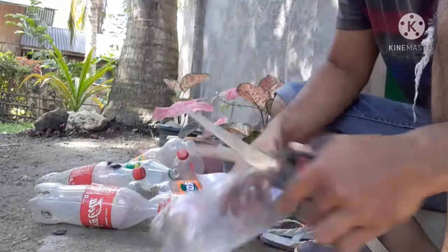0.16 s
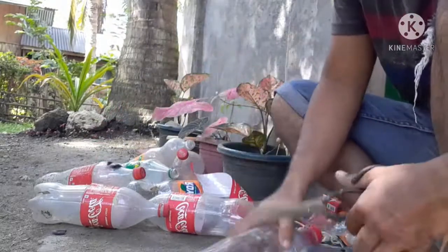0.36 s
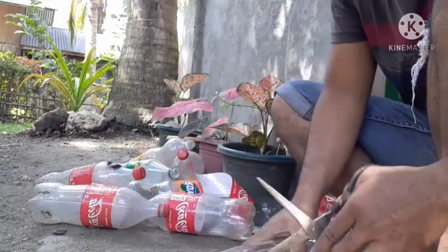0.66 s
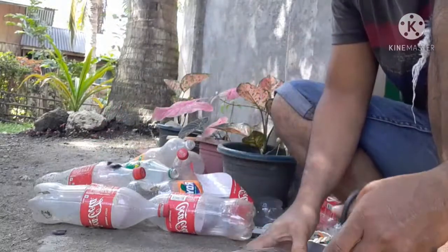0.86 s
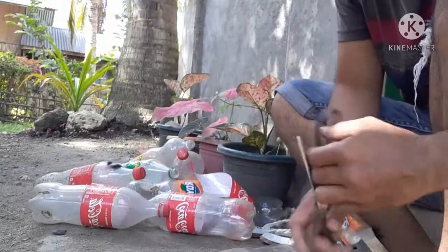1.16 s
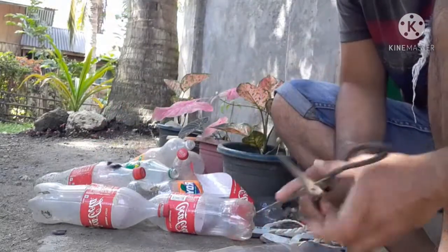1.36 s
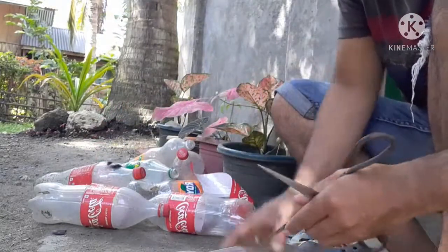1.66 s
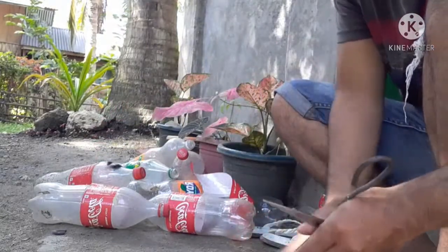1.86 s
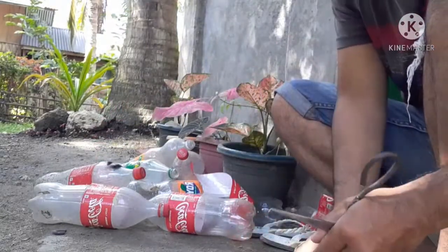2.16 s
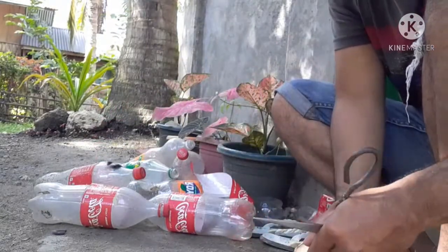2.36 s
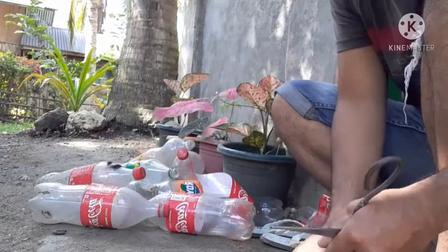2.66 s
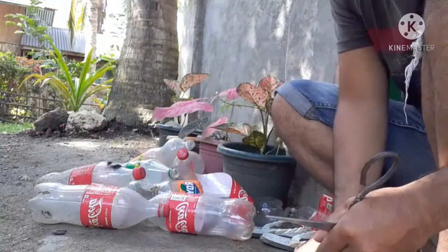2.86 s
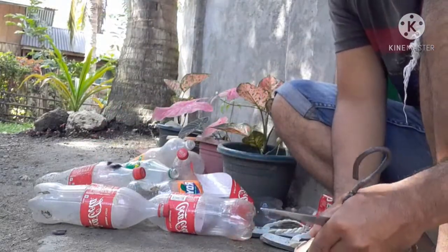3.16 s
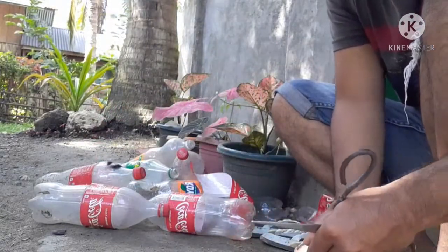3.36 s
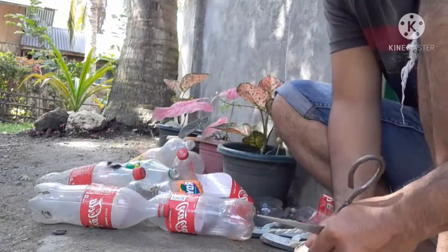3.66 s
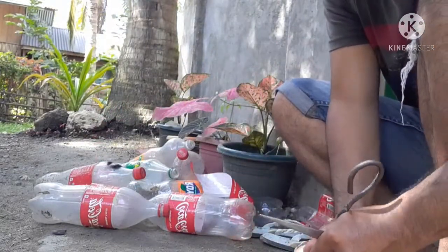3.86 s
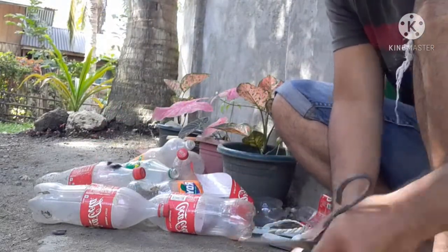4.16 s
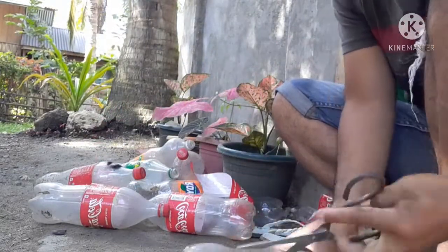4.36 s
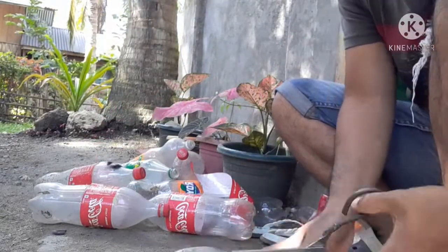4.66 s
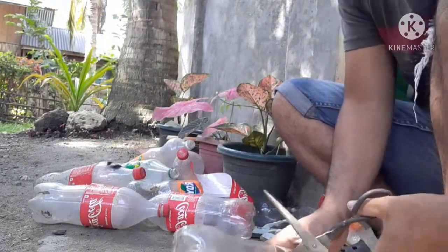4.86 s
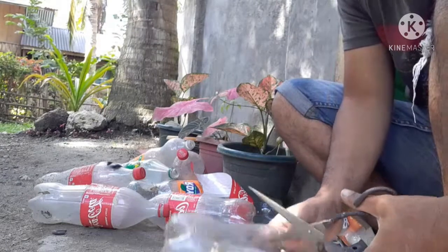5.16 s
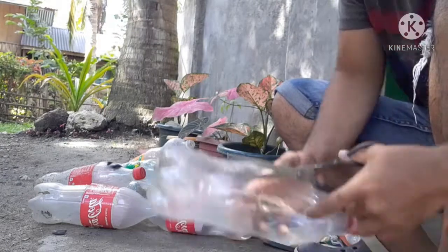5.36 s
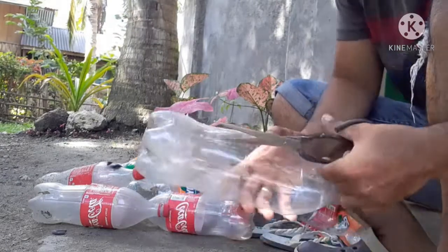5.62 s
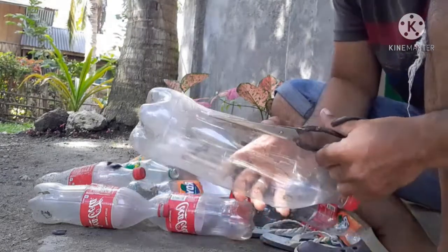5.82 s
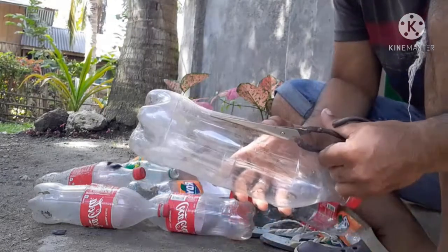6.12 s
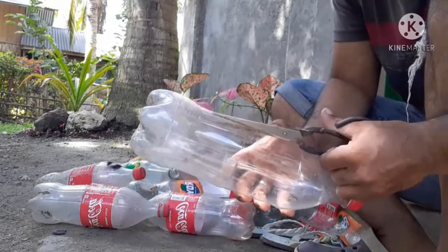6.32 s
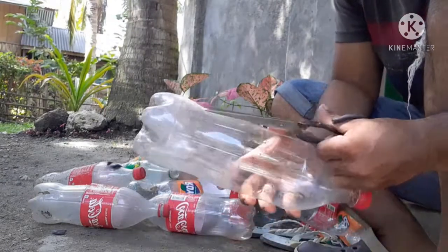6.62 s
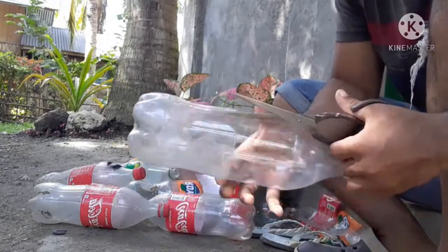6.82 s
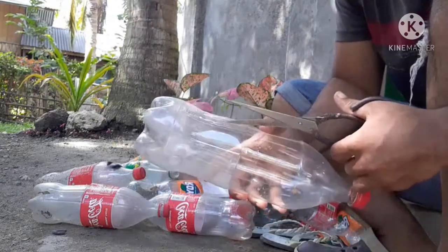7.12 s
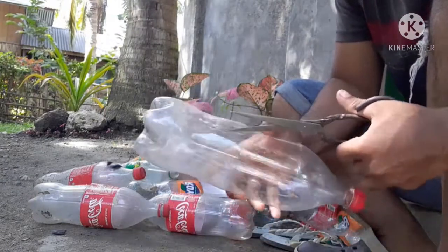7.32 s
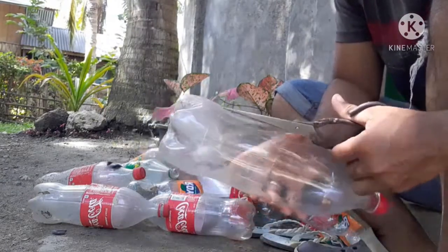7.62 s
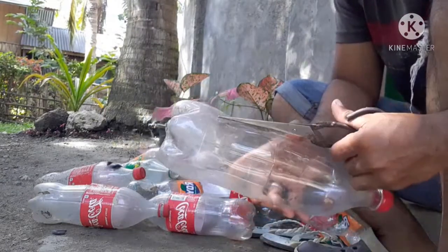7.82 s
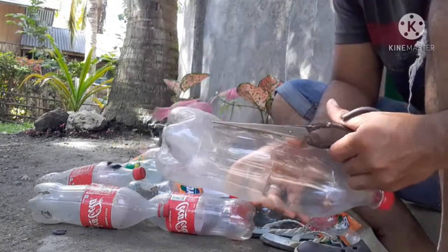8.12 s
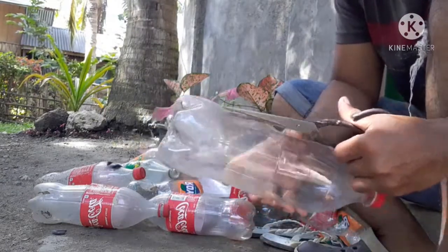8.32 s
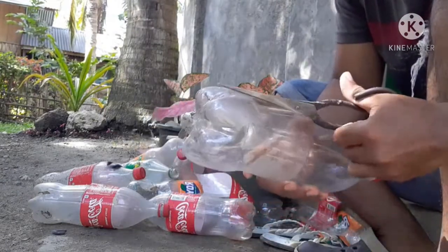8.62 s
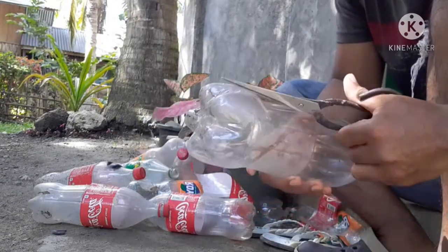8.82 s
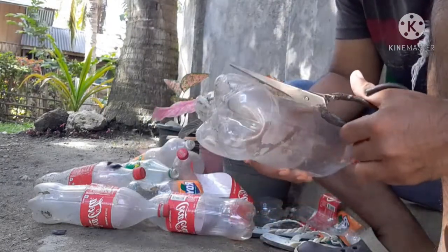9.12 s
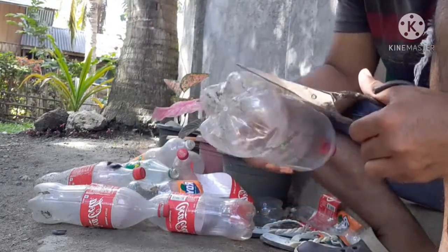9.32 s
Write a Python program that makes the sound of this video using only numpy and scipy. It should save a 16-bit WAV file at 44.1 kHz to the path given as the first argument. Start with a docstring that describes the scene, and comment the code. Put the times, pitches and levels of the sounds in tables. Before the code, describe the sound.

Scissors cut a thin plastic bottle with scattered snaps and crinkles outdoors, and an animal gives one squeal midway.

```python
"""Scissors cutting a plastic bottle

Scissors pierce and cut a thin plastic bottle close to a phone in a walled yard. The shell buckles
in sharp snaps that set it ringing, and crinkles in the hand between them. An animal nearby, perhaps
a young rooster, gives one long squeal, hoarse at first, then clear and sinking, over a faint rumble."""
import sys
import numpy as np
from scipy import signal
from scipy.fft import rfft, irfft
from scipy.io import wavfile
from scipy.ndimage import uniform_filter1d

SR = 44100
rng = np.random.default_rng(int(sys.argv[2]) if len(sys.argv) > 2 else 0)


def master(y):
    """Save y as 16-bit WAV."""
    cut = np.clip(np.atleast_2d(y).T, -1, 1)
    pcm = np.round(cut * 32767)  # scale
    wavfile.write(sys.argv[1], SR, pcm.astype(np.int16))


N = 418068
TOP_HZ = 15900


def undb(db):
    """Decibels to gain."""
    return 10 ** (np.asarray(db) / 20)


def unit(x):
    """Scale to unit rms."""
    return x / np.sqrt(np.mean(x ** 2) + 1e-20)


def freqs(size):
    """Bin frequencies, floored at 1 Hz."""
    return np.maximum(np.fft.rfftfreq(size, 1 / SR), 1)


def contour(points, hz):
    """Interpolate (freq_hz, level_db) points over log frequency."""
    freq_hz, level_db = np.transpose(points)
    return np.interp(np.log(hz), np.log(freq_hz), level_db)


def band(x, lo_hz, hi_hz, order=2):
    """Causal band-pass."""
    sos = signal.butter(order, [lo_hz, min(hi_hz, SR / 2 - 1)], "band", fs=SR, output="sos")
    return signal.sosfilt(sos, x)


def resonate(x, modes):
    """Sum of resonances, one per (freq_hz, width_hz, gain_db) row."""
    return sum(undb(db) * band(x, hz - width / 2, hz + width / 2, order=1) for hz, width, db in modes)


def walk(rate_hz):
    """Smooth random wander, unit rms."""
    hold = max(int(SR / rate_hz), 1)
    steps = np.repeat(rng.standard_normal(N // hold + 1), hold)
    return unit(uniform_filter1d(uniform_filter1d(steps, hold), hold)[:N])


def add(track, start_s, x):
    """Mix x into the track at start_s."""
    i = max(int(start_s * SR), 0)
    track[..., i:i + x.shape[-1]] += x[..., :max(N - i, 0)]


# narrow-toned wall pops and thin high blade ticks: start_s, level_db, pitch_hz
POPS_AND_TICKS = [(2.1479, -48, 9150), (2.875, -47.9, 8600), (2.8925, -38, 8300), (3.47, -35, 1550),
                  (3.5462, -46.5, 8790), (4.1489, -30, 950), (4.8536, -30, 3256), (4.9951, -30, 1680),
                  (5.249, -27.5, 1670), (6.5205, -24.5, 5330), (6.7503, -48, 5530), (7.057, -57.5, 2100),
                  (7.6352, -47.5, 3920), (7.7599, -36.5, 3450), (7.8616, -35, 4650), (8.7365, -50, 3500),
                  (8.766, -44.5, 1710), (8.9039, -43.5, 2080), (9.0376, -44, 1750), (9.1296, -36, 2670),
                  (9.1757, -40.5, 2130)]
# broad cracks and dull knocks of the bottle: start_s, level_db, pitch_hz
CRACKS_AND_KNOCKS = [(0.3232, -48.5, 1210), (0.855, -58.5, 500), (1.428, -66, 3020), (1.6903, -42.5, 5900),
                     (1.862, -49.5, 5730), (2.006, -44.5, 8700), (2.228, -57.5, 640), (2.3989, -41.5, 8600),
                     (2.514, -43, 4500), (3.1193, -49, 5800), (3.2857, -29.5, 1300), (3.302, -23.5, 2100),
                     (3.3198, -27, 4710), (3.8829, -31, 9000), (3.93, -33.5, 4150), (3.9347, -23.5, 1340),
                     (3.9643, -20.5, 734), (4.0397, -20, 815), (4.1916, -20, 945), (4.1949, -23, 3448),
                     (4.2185, -23.5, 4070), (4.6106, -29.5, 1720), (4.7398, -26, 3400), (4.7435, -25, 2000),
                     (4.9483, -36, 1646), (5.1832, -37, 2047), (6.048, -54, 860), (6.5035, -45, 1100),
                     (7.3849, -37.5, 1720), (7.4799, -44, 2320), (7.872, -35.5, 3120), (7.9648, -38, 2550),
                     (8.2012, -34, 1560), (8.216, -38, 1850), (8.2322, -35.5, 3630), (8.3174, -25, 3580),
                     (8.3227, -26.5, 3370), (8.3471, -21.5, 2000), (8.841, -42.5, 2960), (9.455, -45, 3800)]


def snaps():
    """The wall pops and the blades tick; the bottle cracks and knocks as it is cut, handled or set down."""
    narrow = impacts(POPS_AND_TICKS, below_db_per_oct=8.5, above_db_per_oct=27)
    broad = impacts(CRACKS_AND_KNOCKS, below_db_per_oct=5.5, above_db_per_oct=7)
    return narrow + broad


# body, crack and sizzle of a snap: low_hz, centre_hz, high_hz
IMPACT_BANDS = [(150, 800, 1400), (1400, 2600, 5000), (5000, 8500, 16000)]


def impacts(events, below_db_per_oct, above_db_per_oct, creep_db=-29, stereo_spread=.6):
    """A faint lead-in, then a burst of milliseconds; bending waves circle the bottle and die away."""
    lead_s, snap_s = .012, .006
    decay_s, ring_t60_s, ring_db = (.0023, .0019, .0014), (.12, .15, .15), (-15.5, -16, -15.5)
    out, t = np.zeros((2, N)), np.arange(SR // 4) / SR - lead_s
    after_s = np.maximum(t, 0)
    for start_s, level_db, pitch_hz in events:
        burst, wash = rng.standard_normal((2, 1, len(t)))
        per_port = stereo_spread * rng.standard_normal((2, len(t)))
        octaves = np.log2(np.array(IMPACT_BANDS)[:, 1] / pitch_hz)
        shape_db = np.minimum(below_db_per_oct * octaves, -above_db_per_oct * octaves)
        band_db = level_db + shape_db - 10 * np.log10(np.sum(undb(shape_db) ** 2))
        for i, (low_hz, centre_hz, high_hz) in enumerate(IMPACT_BANDS):
            pulse = np.where(t < 0, undb(creep_db) * np.exp(2 * t / snap_s), np.exp(-after_s / decay_s[i]))
            # short waves leave the curved wall differently towards each port
            push = (burst if i == 0 else burst + per_port) * pulse
            # a few cycles of swing, little bass
            swing_hz = np.clip(pitch_hz, centre_hz * .81, centre_hz * 1.4)
            push = band(push, swing_hz * .59, swing_hz * 1.87, order=1) + undb(-12) * push
            crack = band(shell(push, broad_db=-5), low_hz, high_hz, order=3)
            crack *= np.sqrt(snap_s * SR / np.sum(crack.mean(axis=0) ** 2))
            waves = (wash + per_port) * undb(-60 * after_s / ring_t60_s[i])
            ring = band(shell(waves, broad_db=-15.5), low_hz, high_hz, order=3)
            ring *= 1 - np.exp(-2 * after_s / snap_s)
            ring /= np.std(ring[:, :SR // 20])
            # a harder crack rings the whole bottle more
            tail_db = (band_db[i] + band_db[1]) / 2 + ring_db[i]
            add(out, start_s - lead_s, undb(band_db[i]) * crack + undb(tail_db) * ring)
    return out


# bottle resonances: freq_hz, width_hz, gain_db
SHELL_MODES = [(300, 410, -4.5), (770, 280, -2), (1134, 110, -3.5), (1340, 160, -3.5), (2000, 160, 3.5),
               (2194, 120, 0.5), (3560, 810, -7.5)]


def shell(x, broad_db, crease_db=2.5, grip_detune=.02, crease_min_hz=900):
    """Bottle modes detuned by the grip, two modes of the yielding crease, and an unfiltered share."""
    detune = 1 + grip_detune * rng.standard_normal()
    modes = resonate(x, np.array(SHELL_MODES) * [detune, 1, 1])
    crease = sum(band(x, hz, hz * 1.05, order=1) for hz in crease_min_hz * np.exp(rng.random(2)))
    return modes + undb(crease_db) * crease + undb(broad_db) * x


# flurries of tiny creases: start_s, end_s, level_db, tilt_db_per_oct
CRINKLE_SPELLS = [(0.836, 1.013, -71.5, -7.5), (1.664, 1.704, -60.5, -1), (1.742, 1.81, -55, 0.5),
                  (1.841, 1.879, -58, 0), (2.39, 2.43, -61.5, -6.5), (2.485, 2.66, -60, 1),
                  (3.88, 4.009, -46, -0.5), (4.149, 4.219, -48.5, -2.5), (6.516, 6.582, -52, 1),
                  (7.159, 7.191, -64.5, -0.5), (7.243, 7.333, -74, 2.5), (7.468, 7.582, -53.5, -2),
                  (8.288, 8.367, -41, -4.5), (8.384, 8.474, -56.5, -3.5), (8.796, 8.886, -54, -4.5),
                  (8.95, 9.02, -60.5, -3), (9.116, 9.19, -51.5, -3.5), (9.262, 9.38, -63.5, -1),
                  (9.403, 9.536, -52.5, -3)]


def crinkles(slips_per_s=600, spread_db=5, decay_s=.0026, grip_db=5):
    """Tiny creases give way under shifting fingers, each patch with its own click."""
    out, t = np.zeros(N), np.arange(SR // 20) / SR
    grips = [undb(grip_db * walk(55)) for _ in range(4)]
    fade = np.exp(-t / decay_s) + undb(-15.5) * np.exp(-t / .014)
    for start_s, end_s, level_db, tilt_db_per_oct in CRINKLE_SPELLS:
        size = int((end_s - start_s) * SR)
        padded = size + len(t) - 1
        spell = np.zeros(padded)
        for grip in grips:
            onsets = rng.random(size) < slips_per_s / len(grips) / SR
            slips = onsets * undb(spread_db * np.minimum(rng.exponential(size=size), 3))
            slips *= np.roll(grip, -int(start_s * SR))[:size] * signal.windows.tukey(size)
            click = shell(rng.standard_normal(len(t)) * fade, broad_db=0, crease_db=-.5)
            spell += signal.fftconvolve(slips, click)
        tilt = undb(tilt_db_per_oct * np.log2(np.maximum(freqs(padded) / 700, 1)))
        spell = irfft(rfft(band(spell, 150, TOP_HZ)) * tilt, padded)
        add(out, start_s, unit(spell) * np.sqrt(padded / size) * undb(level_db))
    return out


# squeezes by hand and blade: start_s, length_s, level_db, pitch_hz
WALL_CREAKS = [(5.731, 0.11, -62, 920), (6.268, 0.072, -57, 783), (6.346, 0.052, -53, 790),
               (6.434, 0.07, -62.5, 716), (8.148, 0.046, -53, 700)]


def creaks(grain_db=5, upper_ratio=2.36, upper_db=-4):
    """Stick-slip under swelling and easing pressure rings two hollow resonances."""
    out = np.zeros(N)
    grain = undb(grain_db * walk(260))
    for start_s, length_s, level_db, pitch_hz in WALL_CREAKS:
        size = int(length_s * SR)
        pressure = signal.windows.triang(size)
        slips = rng.standard_normal(size) * pressure * np.roll(grain, -int(start_s * SR))[:size]
        slips = np.pad(slips, (0, SR // 20))
        upper_hz = pitch_hz * upper_ratio
        ring = band(slips, pitch_hz * .88, pitch_hz * 1.13)
        ring += undb(upper_db) * band(slips, upper_hz * .8, upper_hz * 1.18)
        add(out, start_s, undb(level_db) * unit(ring) * np.sqrt(size / len(slips)))
    return out


# blade drags along the wall: start_s, end_s, level_db
BLADE_RUBS = [(1.914, 2.073, -61), (2.448, 2.678, -59.5), (2.67, 2.9, -72)]
# resonances of the rubbed wall: freq_hz, width_hz, gain_db
RUBBED_WALL_MODES = [(1295, 85, 0.5), (1990, 140, -17)]


def rubs(broad_db=-19, grit_db=5):
    """The edge catches and slides on the plastic; friction rings the wall under it."""
    envelope = np.zeros(N)
    drag = rng.standard_normal(N) * undb(grit_db * walk(200))
    ring = unit(resonate(drag, RUBBED_WALL_MODES) + undb(broad_db) * drag)
    for start_s, end_s, level_db in BLADE_RUBS:
        add(envelope, start_s, undb(level_db) * signal.windows.tukey(int((end_s - start_s) * SR)))
    return envelope * ring


# blade-on-blade strokes: start_s, level_db
BLADE_SWISHES = [(0.075, -53), (0.324, -50), (0.707, -50.5), (0.742, -39), (0.893, -50.5), (0.974, -45.5),
                 (1.118, -48.5), (1.466, -49.5), (2.249, -48.5), (4.092, -47), (5.467, -51)]


def swishes(swell_s=.0043, low_hz=9000):
    """Steel slides on steel: a short bright hiss."""
    out, t = np.zeros(N), np.arange(SR // 4) / SR
    envelope = t / swell_s * np.exp(1 - t / swell_s)
    for start_s, level_db in BLADE_SWISHES:
        hiss = band(rng.standard_normal(len(t)), low_hz, TOP_HZ, order=1)
        add(out, start_s, undb(level_db) * hiss * envelope)
    return out


# hand against bottle: start_s, level_db
HAND_BUMPS = [(1.672, -48), (3.934, -40.5), (7.382, -51), (8.325, -53)]


def bumps(attack_s=.003, decay_s=.024):
    """Soft contact moves the whole bottle: a short low thud."""
    out, t = np.zeros(N), np.arange(SR // 4) / SR
    envelope = (1 - np.exp(-t / attack_s)) * np.exp(-t / decay_s)
    for start_s, level_db in HAND_BUMPS:
        thud = unit(band(rng.standard_normal(len(t)), 79, 270))
        add(out, start_s, undb(level_db) * thud * envelope)
    return out


# course of the call: time_s, pitch_hz, level_db, hoarseness (0 = clear)
SQUEAL_PATH = [(4.348, 1130, -44.5, 0.76), (4.391, 1307, -35, .3), (4.435, 1272, -35, 0.49),
               (4.472, 1121, -45.5, 0.99), (4.503, 1226, -36.5, 0.67), (4.78, 1215, -38.5, .85),
               (4.815, 1041, -43, 0.99), (4.864, 1232, -37, 0.72), (4.91, 1209, -52, 0.35),
               (5.039, 1189, -41.5, 0.051), (5.269, 1167, -40, 0.016), (5.398, 1125, -42.5, 0.07),
               (5.422, 1084, -38.5, 0.81), (5.461, 1004, -53.5, 1.23)]
# partials 3 to 12, relative to the second: level_db
SQUEAL_PARTIALS_DB = [-24, -16.5, -25, -34, -35.5, -30.5, -21.5, -29, -19.5, -18.5]


def squeal(jitter=.055, waver=.0022, shimmer_db=7, throb_db=5, rasp_db=-9, split_hz=2568.5, split_db=-40):
    """A tight throat: hoarseness shakes pitch and level and adds rasp; an unrelated tone splits off."""
    t = np.arange(N) / SR
    time_s, *columns = np.transpose(SQUEAL_PATH)
    pitch_hz, level_db, hoarse = (np.interp(t, time_s, column) for column in columns)

    def gate(start_s, end_s, fade_s):
        return np.clip(np.minimum(t - start_s, end_s - t) / fade_s + .5, 0, 1)

    def shaken_phase(hz, depth):
        bend = 1 + waver * walk(40) + depth * hoarse * (.65 * walk(1000) + .25 * walk(220))
        return 2 * np.pi * np.cumsum(hz * bend) / SR

    def flutter():
        return undb(shimmer_db * hoarse * (np.tanh(walk(230)) - 1 / 3))

    phase = shaken_phase(pitch_hz, jitter)
    overtones = sum(undb(db + 2 * walk(15)) * np.sin(k * phase)
                    for k, db in enumerate(SQUEAL_PARTIALS_DB, start=3))
    upper = np.sin(2 * phase) + overtones * (1 + hoarse)
    upper_gain = undb(6.5 - 15 * hoarse)  # clear favours the second partial, hoarse the first
    noise = rng.standard_normal(N)
    rasp = unit(band(noise, 2400, 3100) + undb(-12.5) * band(noise, 1000, 6000))
    rasp *= 1 + np.cos(phase) / 2
    voice = np.sin(phase) * flutter() + upper_gain * upper * flutter()
    voice *= np.sqrt(2 / (1 + upper_gain ** 2))
    voice += undb(rasp_db) * hoarse ** 2 * rasp * flutter()
    split = undb(split_db) * np.sin(shaken_phase(split_hz, jitter / 2)) * flutter()
    voice *= undb(level_db + throb_db * hoarse * np.tanh(walk(35)))
    return gate(time_s[0], time_s[-1], .0076) * voice + gate(4.55, 5, .04) * split


# background spectrum: freq_hz, density_db
YARD_SPECTRUM = [(30, -34), (70, -12.5), (120, -2.5), (190, 0), (440, -12), (650, -23), (2300, -33.5),
                 (6400, -36.5), (8700, -27.5), (12000, -31), (16000, -53.5)]
# background level: time_s, level_db
YARD_LEVELS = [(2.6, -67.5), (3.097, -68.5), (9.4, -67)]


def yard(flutter_db=3, hiss_swing_db=3, crossover_hz=6400):
    """A distant rumble, alike at both ports, under a thin hiss that swells and fades."""
    hz = freqs(N)
    mid, side = (rfft(rng.standard_normal(N)) * undb(contour(YARD_SPECTRUM, hz)) for _ in range(2))
    side *= np.clip(hz / 2500, .13, .6)
    stereo = (mid + np.array([side, -side])) / np.std(irfft(mid, N))
    rumble = irfft(stereo * (hz < crossover_hz), N) * undb(flutter_db * walk(11))
    hiss = irfft(stereo * (hz >= crossover_hz), N) * undb(hiss_swing_db * walk(25))
    return (rumble + hiss) * undb(np.interp(np.arange(N) / SR, *np.transpose(YARD_LEVELS)))


def hum(pitch_hz=470, level_db=-72):
    """A faint far-off tone that soon dies away."""
    t = np.arange(N) / SR
    envelope = np.interp(t, [.4, .5, 1.6], [0, 1, 0])
    return undb(level_db + 2 * walk(7)) * np.sin(2 * np.pi * pitch_hz * t) * envelope


def walls(x, tail_db, t60_s, low_hz=250):
    """The yard's walls add a short dull tail, different at each port."""
    t = np.arange(SR // 2) / SR
    noise = band(rng.standard_normal((2, len(t))), low_hz, 4500, order=1)
    tails = unit(noise * undb(-60 * t / t60_s) * (t > .01)) / np.sqrt(len(t))
    return x + undb(tail_db) * signal.fftconvolve(x, tails, axes=1)[:, :N]


def scatter(x, side_db=-4.5, decay_s=.0025):
    """Hand and phone scatter near treble differently to the two ports."""
    t = np.arange(SR // 20) / SR
    echo = band(rng.standard_normal(len(t)) * np.exp(-t / decay_s), 1600, TOP_HZ)
    side = signal.fftconvolve(x.mean(axis=0), undb(side_db) * echo / np.linalg.norm(echo))[:N]
    return x + np.array([side, -side])


def scene():
    """The bottle close by, the squeal to the right, the yard behind."""
    cutting = snaps() + crinkles() + creaks() + rubs()
    bottle = walls(cutting + swishes() + bumps(), tail_db=-32.5, t60_s=.3)
    pan = undb([[-2], [1]])
    call = walls(squeal() * pan, tail_db=-19, t60_s=.4, low_hz=2000)
    return scatter(bottle) + call + yard() + hum()


# microphone port balance: freq_hz, left_minus_right_db
PORT_BALANCE = [(2200, 1), (5000, 1), (8500, 12.5), (14000, 22.5)]


def record(dry, right_lag_s=.00003, rolloff_hz=13600):
    """The phone's left port is brighter, its right slightly late; the top rolls off and is cut."""
    hz = freqs(N)
    ratio = undb(contour(PORT_BALANCE, hz))
    ports = np.array([ratio, np.exp(-2j * np.pi * hz * right_lag_s)]) * 2 / (1 + ratio)
    rolloff = 1 / np.sqrt(1 + (hz / rolloff_hz) ** 10)
    top_cut = signal.ellip(8, .2, 70, TOP_HZ, fs=SR, output="sos")
    return signal.sosfilt(top_cut, irfft(rfft(dry) * ports * rolloff, N))


dry = scene()
out = record(dry)
master(out)
```